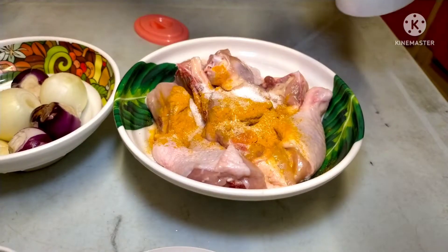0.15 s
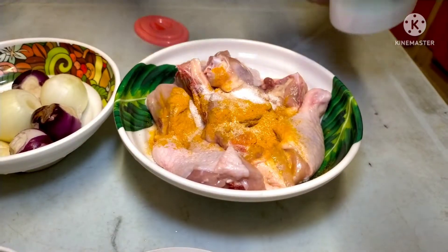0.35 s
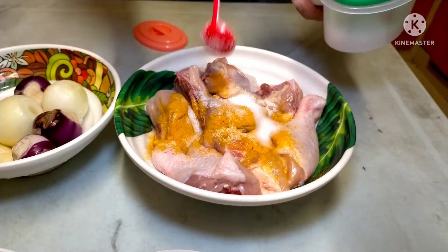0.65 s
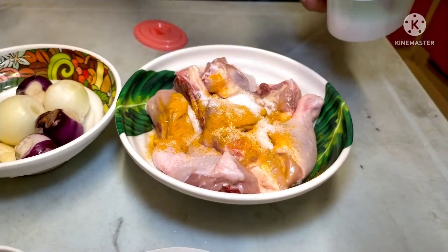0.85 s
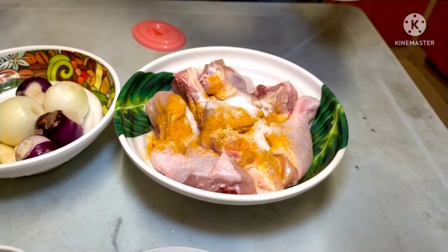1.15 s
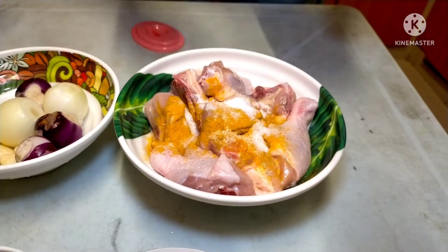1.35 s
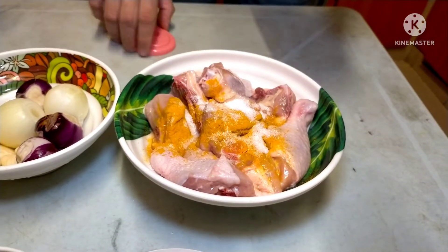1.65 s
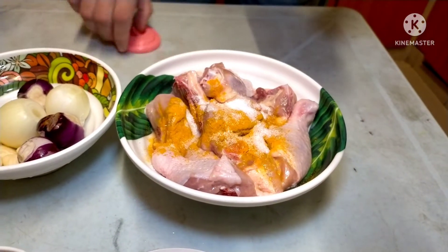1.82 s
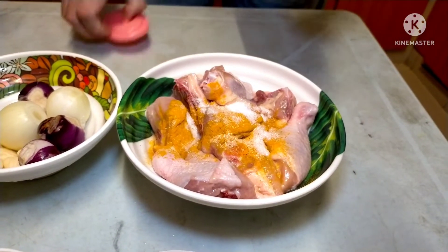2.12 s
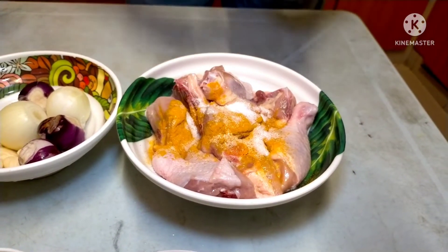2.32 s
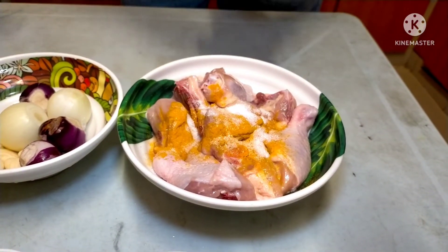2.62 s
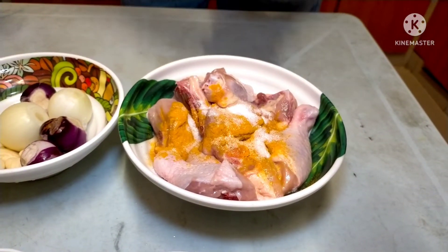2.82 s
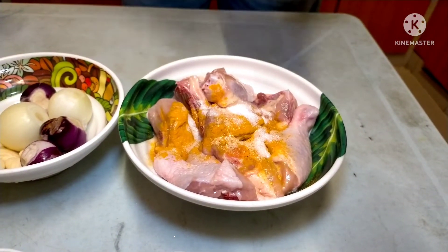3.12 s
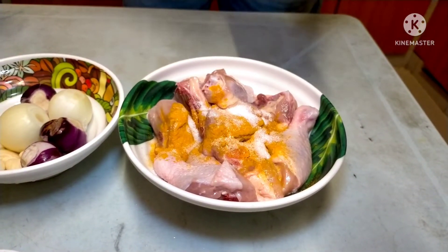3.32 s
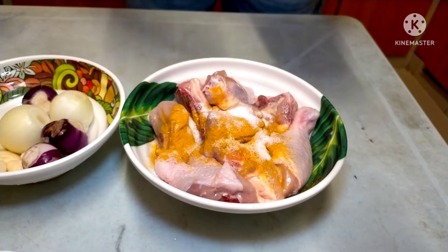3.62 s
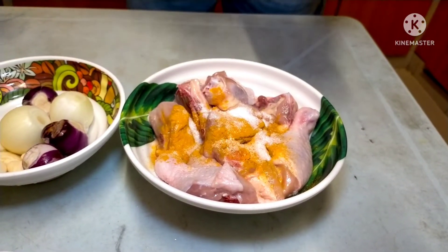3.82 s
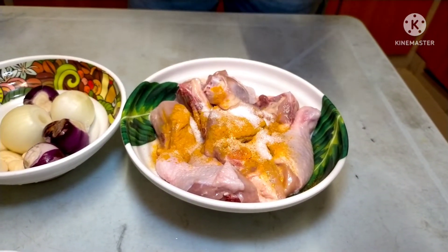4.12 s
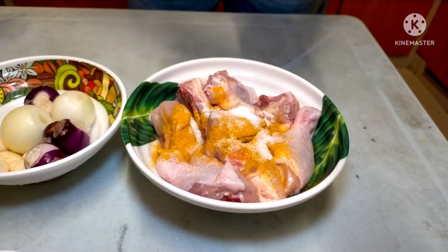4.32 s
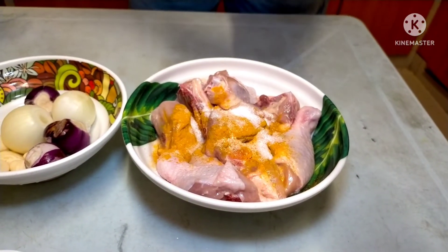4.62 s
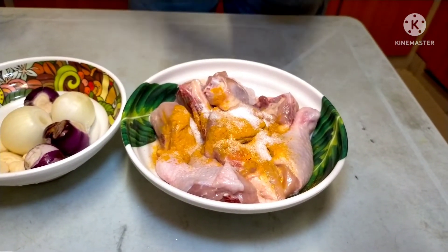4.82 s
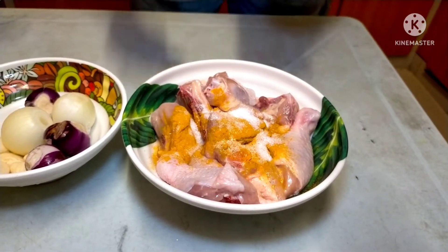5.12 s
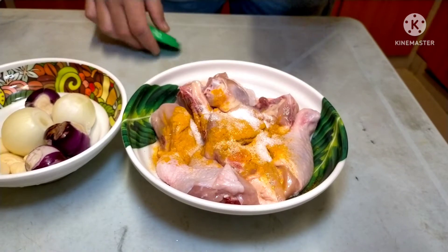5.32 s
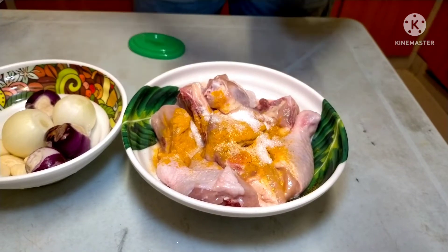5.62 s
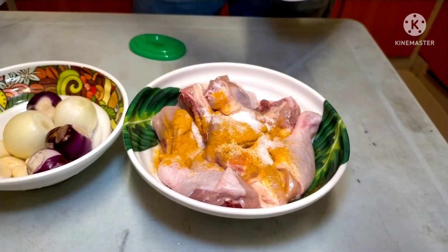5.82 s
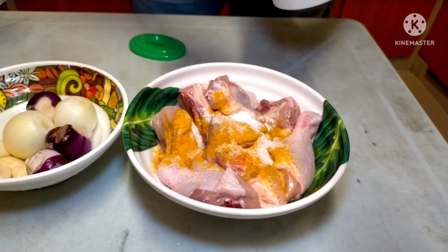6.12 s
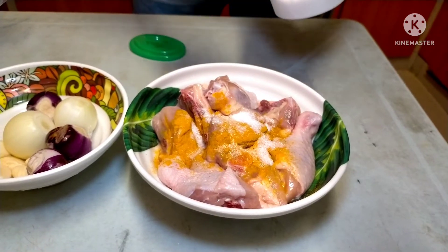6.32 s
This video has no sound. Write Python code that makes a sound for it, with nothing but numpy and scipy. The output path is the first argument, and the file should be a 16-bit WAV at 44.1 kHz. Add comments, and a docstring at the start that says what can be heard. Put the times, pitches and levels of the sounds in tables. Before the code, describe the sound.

A phone close to a kitchen table picks up light plastic containers and lids being handled. Faint rim ticks come first, then a firm flurry of clacks with a short scrape, looser rattles and taps, a cluster of snaps, and finally one sharp, loud knock as a lid lands. A soft appliance hum and airy noise continue throughout, with short hard-room reflections.

```python
"""A small hard-walled kitchen: plastic tubs and lids are snapped, slid and set down on a light table.
A phone microphone is close by. Behind, an appliance hums and drones: shaped noise and wavering tones.
Each contact rings modes of the plastic, knocks the table top and ticks and cracks at the rim.
Slides are dense stick-slip clicks; thumps are short swings of the table, low to middling in pitch.
The room answers with random echoes that die at their own speed in each band."""
import sys
import numpy as np
from scipy import signal
from scipy.io import wavfile
from scipy.ndimage import uniform_filter1d

SR = 44100
rng = np.random.default_rng(int(sys.argv[2]) if len(sys.argv) > 2 else 0)


def log_audio(samples):
    """Write samples as a 16-bit WAV file to the path given in sys.argv[1]."""
    # one column per channel
    frames = np.atleast_2d(samples).T
    # limit to full scale, then quantise
    limited = np.clip(frames, -1, 1)
    pcm = np.round(limited * 32767).astype(np.int16)
    wavfile.write(sys.argv[1], SR, pcm)


N = 284617  # samples

# Appliance noise spectrum, relative: (f/Hz, density/dB per Hz)
AIR_SPECTRUM = [(20, -5.5), (45, -31), (75, -19.5), (130, -17), (320, -16), (520, -25), (800, -19.5),
                (1400, -22.5), (2300, -29), (3100, -31.5), (4200, -38), (6800, -41.5), (8300, -36.5),
                (10500, -41), (13000, -40), (16000, -38), ]
# Swell of the appliance noise, mainly in its mids: (t/s, level/dB)
AIR_SWELL = [(0, -42), (.7, -43), (1.1, -42.5), (2.4, -46.5), (3.4, -43.5), (3.9, -46), (5.3, -42),
             (6.0, -50.5), (6.45, -45)]
# Wavering tones of the appliance: (f/Hz, width/Hz, level/dB)
HUM_TONES = [(96.9, 3.5, -60.5), (153.7, 7.7, -61), (301.4, 30, -65.5), (355.5, 6.4, -68), (663, 27, -63.5),
             (852, 5.9, -60.5)]
# Decay of the kitchen: (f/Hz, t60/s)
ROOM_DECAY = [(100, 0.42), (400, 0.36), (1500, 0.39), (4000, 0.43), (9000, 0.34), (16000, 0.64)]
# Ring of the table top: (f/Hz, relative level/dB, t60/s)
TABLE_MODES = [(139, -7.5, 0.055), (187.5, -6, 0.13), (246.6, 7, 0.036), (324, 6.5, 0.058), (401, 5, 0.034)]
# Ring of the tubs and lids: (f/Hz, relative level/dB, t60/s)
PLASTIC_MODES = [(566, -6, 0.027), (714, -3, 0.033), (851, -5, 0.044), (940, -3.5, 0.042),
                 (1042, -1, 0.025), (1217, 6.5, 0.0083), (1285, 1.5, 0.012), (1442, 1, 0.014),
                 (1715, 0.5, 0.019), (1832, -9, 0.047), (2084, 1, 0.012)]
# Upper modes of lids and rims: (f/Hz, relative level/dB, t60/s)
UPPER_MODES = [(1730, 2, 0.018), (2048, 0, 0.024), (2297, -2, 0.017), (2545, 1, 0.016), (2842, -2, 0.019),
               (2980, -1, 0.012), (3252, -1, 0.014), (3505, -4, 0.017), (3830, -2, 0.0088)]
# Rim tick spectrum, relative: (f/Hz, density/dB per Hz)
TICK_SPECTRUM = [(4500, -43), (6200, -14.5), (7200, -9), (8400, 2), (9300, -3.5), (10300, -5.5),
                 (12500, -5), (14700, -5.5), (15600, -7)]
# Spectrum of the crack of a blow, relative: (f/Hz, density/dB per Hz)
CRACK_SPECTRUM = [(1500, -40.5), (3000, -0.5), (4200, -3), (5500, -10.5), (7000, -11), (9000, -38)]
# Thumps of the table: (t/s, relative level/dB, f/Hz)
TABLE_THUMPS = [(1.63, -23, 108), (1.655, -30.5, 56), (1.672, -29, 197), (1.96, -30, 90),
                (1.966, -17.5, 227), (2.059, -33.5, 100), (2.064, -21, 206), (4.035, -22.5, 475),
                (4.482, -24.5, 345), (5.409, -36, 94), (5.527, -34, 87)]
# Strokes of plastic: (start t/s, build t/s, ease t/s, top pressure level/dB, rubbed part f/Hz,
# fine hiss level/dB, table rumble level/dB); the last two are relative to the pressure
STROKES = [(0.1, 0.011, 0.033, -39, 1330, -7, -22), (1.098, 0.029, 0.034, -28.5, 1400, -6, -22),
           (1.655, 0.023, 0.025, -17, 1190, -18.5, -26), (2.529, 0.0021, 0.015, -27, 880, -29, -9),
           (2.56, 0.034, 0.04, -55, 764, -24, -22), (2.767, 0.035, 0.0054, -32, 1400, -13.5, -38),
           (3.407, 0.003, 0.12, -41.5, 750, -11, -10), (4.007, 0.0041, 0.021, -24.5, 1060, -20, -18),
           (4.017, 0.016, 0.015, -24, 1050, -14, -17), (4.789, 0.044, 0.039, -40, 1020, -19, -4.5),
           (4.93, 0.013, 0.08, -40, 1260, -9, -21), (4.978, 0.035, 0.053, -32.5, 1450, -9, -25),
           (5.411, 0.0072, 0.096, -31, 730, -18, 3), (5.768, 0.0052, 0.045, -39, 1200, -13, -37),
           (5.836, 0.0081, 0.023, -39.5, 2080, -12, -20), (6.1, 0.05, 0.067, -60.5, 1490, 3, -18)]
# Contacts: (t/s, blow level/dB, struck part f/Hz, table knock level/dB, struck rim f/Hz,
# upper modes level/dB, rim tick level/dB, room level/dB); all but the first level are relative to the blow
CONTACTS = [(0.105, -44.5, 1330, -20, 3310, 2.5, -16, 3), (1.091, -41, 750, -11.5, 2590, -10, 1, 0),
            (1.094, -34, 746, -9, 2600, -4, 5.5, 4), (1.139, -31, 1300, -20, 2300, -6, -8, -6),
            (1.173, -34.5, 930, -25, 2500, -4, 4.5, -7), (1.185, -44, 918, -24, 2500, -7, -2, -1),
            (1.198, -36, 1940, -8, 2450, -5, 1.5, -7), (1.2751, -26.5, 625, -8, 2400, -11, -16.5, -2.5),
            (1.646, -29, 900, -3.5, 2550, -37, -27, 10), (1.8614, -18.5, 2040, -17, 2110, -1.5, -16, 2.5),
            (1.8594, -14.5, 1990, -7.5, 3480, -3.5, -5.5, -2.5), (1.679, -15, 950, -20, 2600, -8, -25, -4),
            (1.672, -26, 1750, -24, 3250, -9, -25, 0), (1.945, -19.5, 1545, -8, 3300, -14.5, -21, 9.5),
            (1.964, -15, 930, -25, 2930, -6.5, -15, -2), (1.969, -16.5, 1430, -17, 2660, -13, -18, -5),
            (1.975, -18.5, 1420, -14, 3170, -19, -10.5, -10), (1.986, -22.5, 880, -8, 1770, -1, -15, -5),
            (2.007, -27, 1120, -20, 2790, -13, -15, 7), (2.061, -23.5, 1570, -1, 3080, -14.5, -23, 2),
            (2.529, -26, 1040, -20, 3040, -5.5, -10, 2.5), (2.559, -23, 1640, -36, 2560, -19, -17, -20),
            (2.576, -17.5, 615, -16, 2680, -14, -14, 2.5), (2.603, -24, 713, -36, 2580, -30, -22, -1),
            (2.651, -26, 675, -28, 2900, -24, -15, -1.5), (2.7957, -19.5, 1554, -6.5, 2680, -12, -28, -1.5),
            (2.849, -30.5, 690, -4, 2760, -19, -35, 1), (2.8985, -22.5, 1220, -33, 2480, -16, -28, -3.5),
            (3.273, -27.5, 644, -12, 2570, -13.5, -14.5, 2), (4.004, -19, 940, -14, 1730, -6.5, -23, -9),
            (4.021, -19, 895, -17, 2570, -25, -28, -17), (4.027, -28, 910, -26, 2050, -13, -20, -17),
            (4.033, -13.5, 605, -33, 2030, -9, -16, 0.5), (4.046, -23, 766, -20, 2050, -23, -15, -2),
            (4.061, -24.5, 670, -12.5, 1870, -29, -24, 6),
            (4.4835, -27.5, 1410, -3, 2740, -11.5, -16.5, 2.5), (4.535, -30, 1080, -27, 2250, -15, -34, -3),
            (4.5835, -29, 785, -26, 2660, -10, -25, -5.5), (4.817, -26, 1030, -12, 2420, -29, -28, -3),
            (4.823, -43, 1020, -20, 2420, -20, -2, 2), (4.924, -31, 1350, -4, 2240, -10, -20, 1),
            (4.995, -24, 970, -21, 2320, -8, -16, -9), (5.005, -27.5, 970, -29, 2380, -1.5, -8, 0.5),
            (5.038, -35.5, 1170, -22, 2450, -1, 4.5, 1.5), (5.0615, -17, 1000, -28, 2700, -22, -28, -8.5),
            (5.4086, -18, 633, -7.5, 2410, -22, -21, 4.5), (5.5253, -11.5, 1460, -7.5, 2720, -9.5, -11, -2),
            (5.545, -25, 1750, -20, 2850, -6, -25, 2), (5.577, -20, 1500, -10, 2830, -13, -34, -1),
            (6.066, -55, 856, -14, 2500, -28, 6, -3), (6.092, -57, 880, -11, 2500, -23, 12, 3)]

# energy of each ring for a blow of 0 dB, before the contact's own offsets, dB
PLASTIC_DB, TABLE_DB, UPPER_DB = 16.5, 18, 20.5
DETUNING = 0.024  # largest shift of a mode at each contact or stroke, as a fraction of its frequency
REBOUND_MS, SCUFF_DB = 2.6, -2.5  # decay time constant of the rough rebound; rim scuff relative to its tick
# crack of a blow follows its upper modes, stronger for a high rim; last, the crack under a stroke
CRACK_DB, CRACK_DB_PER_OCTAVE, RUB_CRACK_DB = 10.5, 10, -22
TOUCH_DB, LIFT_DB = -14, -16  # pressure at the start and end of a stroke, relative to its top
EDGE_HZ = 15650  # upper band limit


def gain_of(db):
    """Decibels to an amplitude factor."""
    return 10 ** (np.asarray(db) / 20)


def evened(x):
    """Scales to rms 1."""
    return x / np.sqrt(np.mean(x ** 2) + 1e-20)


def unit_energy(x):
    """Scales to energy 1."""
    return x / np.linalg.norm(x)


def read(points, hz):
    """Reads a table on a log-frequency axis."""
    f, value = np.transpose(points)
    return np.interp(np.log(hz + 1), np.log(f + 1), value)


def add(mix, s, sound):
    """Mixes a sound in at a time in seconds, cut at the end of the mix."""
    part = mix[round(s * SR):][:len(sound)]
    part += sound[:len(part)]


def appliance_noise():
    """Broad noise with faint drifting patches; its middle band swells."""
    frames, hz = N // 512 + 5, np.fft.rfftfreq(2048, 1 / SR)
    real, imag, patches = rng.standard_normal((frames, 1025, 3)).T
    patches = uniform_filter1d(patches, size=16, axis=0)  # across frequency
    patches = evened(uniform_filter1d(patches, size=8, axis=1))  # across time
    s, db = np.transpose(AIR_SWELL)
    level_db = np.interp(np.arange(frames) * 512 / SR, s, db)
    shape = gain_of(read(AIR_SPECTRUM, hz))
    shape *= 16 / np.linalg.norm(shape[(hz > 300) & (hz < 3000)])
    mids = ((hz > 200) / (1 + (hz / 4000) ** 2))[:, None]
    swell_db = mids * level_db + (1 - mids) * level_db.mean()
    spectra = (real + 1j * imag) * shape[:, None] * gain_of(swell_db + 1.1 * patches)
    return signal.istft(spectra, nperseg=2048, noverlap=1536)[1][:N] / 32


def appliance_hum():
    """Tones whose strength and phase wander: a steady part plus narrow-band complex noise."""
    out, t = np.zeros(N), np.arange(N) / SR
    for f, width, db in HUM_TONES:
        pole = np.exp(-np.pi * width / SR)
        noise = rng.standard_normal(N) + 1j * rng.standard_normal(N)
        wander = signal.lfilter([1], [1, -pole], noise)
        tone = (1.47 + wander / np.std(wander)) * np.exp(2j * np.pi * f * t)
        out += gain_of(db) * evened(tone.real)
    return out


def room(x):
    """Random echoes, each band dying at its own speed; three tails take turns in steady rotation."""
    out, turn = np.zeros(N), np.arange(N) / SR * 2.3
    for k in range(3):
        taps = np.zeros(SR // 2 + 4000)
        at = np.arange(120, len(taps) - 20, 16)  # one echo in every 16 samples
        taps[at + rng.integers(0, 16, len(at))] = rng.choice([-1., 1.], len(at))
        hz, t, z = signal.stft(taps, SR, nperseg=256)
        decay = gain_of(-60 * t / read(ROOM_DECAY, hz)[:, None])
        tail = signal.istft(z * decay, SR, nperseg=256)[1]
        share = np.sqrt(2 / 3) * np.cos(np.pi * (turn + k / 3))  # the squares sum to 1
        out += signal.oaconvolve(x * share, unit_energy(tail))[:N]
    return out


def thumps():
    """A swing of the table, low to middling in pitch, that starts softly and dies in a few cycles."""
    out = np.zeros(N)
    for s, db, hz in TABLE_THUMPS:
        turns = np.arange(8000) / SR * hz
        swing = 3 * turns * np.exp(-turns / 0.59) * np.sin(2 * np.pi * turns)
        add(out, s, gain_of(db) * swing)
    return out


def ring(modes, share_db=0):
    """Impulse response of a set of modes, energy 1; bending waves spread, so each mode has its own phase."""
    hz, db, t60 = np.transpose(modes)[:, :, None]
    hz = hz * (1 + DETUNING * rng.uniform(-1, 1, hz.shape))
    t = np.arange(6000) / SR
    phase_turns = 0.04 * np.arange(len(hz))[:, None]
    decay = gain_of(db + share_db - 60 * t / np.maximum(t60, .004))
    x = (decay * np.sin(2 * np.pi * (hz * t + phase_turns))).sum(axis=0)
    x *= (1 - np.exp(-t / 0.0003)) ** 2  # the contact is not instant
    return unit_energy(x)


def near(modes, hz, octaves, db_down):
    """Level of each mode: those near the struck part's pitch take most, far ones lie db_down lower."""
    away = np.log2(np.transpose(modes)[0][:, None] / hz) / octaves
    return -db_down * (1 - np.exp(-away ** 2))


def burst_colour(points):
    """Causal minimum-phase filter with a given spectrum, energy 1."""
    hz = abs(np.fft.fftfreq(2048, 1 / SR))
    log_gain = np.log(gain_of(np.maximum(read(points, hz), -80)))
    taps = np.fft.ifft(np.exp(np.conj(signal.hilbert(log_gain)))).real[:512]
    return unit_energy(taps)


def slides():
    """Dense stick-slip clicks of uneven size under each stroke; pressure builds, then eases."""
    out, tick, crack = np.zeros(N), burst_colour(TICK_SPECTRUM), burst_colour(CRACK_SPECTRUM)
    unevenness_db = 2.84 * np.minimum(rng.exponential(1, N), 5)
    grit = evened(rng.standard_normal(N) * gain_of(unevenness_db))
    for s, build, ease, db, hz, hiss_db, table_db in STROKES:
        t = np.arange(0, build + ease, 1 / SR)
        pressure_db = db + np.interp(t, [0, build, build + ease], [TOUCH_DB, 0, LIFT_DB])
        slips = grit[round(s * SR):][:len(t)] * gain_of(pressure_db)
        slips *= signal.windows.tukey(len(t), .12)
        body = .5 * ring(PLASTIC_MODES, near(PLASTIC_MODES, hz, 1.0, 9.1))
        body += 0.2 * ring(UPPER_MODES, near(UPPER_MODES, 2720, 0.65, 9.2))
        body += gain_of(table_db) * ring(TABLE_MODES)
        body[:len(tick)] += gain_of(hiss_db) * tick + gain_of(RUB_CRACK_DB) * crack
        add(out, s, signal.fftconvolve(slips, body))
    return out


def contacts():
    """A sharp blow and its rough rebound drive plastic, table and rim; rows: direct sound, feed to the room."""
    out = np.zeros((2, N))
    tick, crack_colour = burst_colour(TICK_SPECTRUM), burst_colour(CRACK_SPECTRUM)
    t = np.arange(1500) / SR
    for s, db, hz, table_db, rim_hz, upper_db, tick_db, room_db in CONTACTS:
        rough = rng.standard_normal(len(t)) * np.exp(-1000 * t / REBOUND_MS)
        push = .04 * rough
        push[0] = 1  # the blow itself
        scuff = signal.fftconvolve(unit_energy(rough), tick)
        crack = signal.fftconvolve(unit_energy(rough), crack_colour)
        crack_db = CRACK_DB + upper_db + CRACK_DB_PER_OCTAVE * np.log2(rim_hz / 2600)
        body = gain_of(PLASTIC_DB) * ring(PLASTIC_MODES, near(PLASTIC_MODES, hz, 0.24, 9.3))
        body += gain_of(TABLE_DB + table_db) * ring(TABLE_MODES)
        body += gain_of(UPPER_DB + upper_db) * ring(UPPER_MODES, near(UPPER_MODES, rim_hz, 0.18, 10.0))
        body[:len(tick)] += gain_of(PLASTIC_DB + tick_db) * tick
        body[:len(crack)] += gain_of(crack_db) * crack
        body[:len(scuff)] += gain_of(PLASTIC_DB + tick_db + SCUFF_DB) * scuff
        add(out[0], s, gain_of(db) * signal.fftconvolve(unit_energy(push), body))
        add(out[1], s, gain_of(db + room_db) * body)
    return out


def scene():
    """Sums the appliance, the thumped table, the plastic and the room's answers, in mono."""
    background = appliance_noise() + appliance_hum()
    thumped, rubbed = thumps(), slides()
    direct, sent = contacts()
    plastic = direct + rubbed + gain_of(0.1) * room(sent + rubbed)
    # small things radiate no deep bass
    plastic = signal.sosfilt(signal.butter(2, 110, "high", fs=SR, output="sos"), plastic)
    return (plastic + thumped + gain_of(2.0) * room(thumped) + background)[None]


def record(dry):
    """Limits the band: a steep linear-phase low-pass takes away the top treble."""
    low_pass = signal.firwin(511, EDGE_HZ, window=("kaiser", 9), fs=SR)
    return signal.oaconvolve(dry, low_pass[None], "same")


dry = scene()
out = record(dry)
log_audio(out)
```